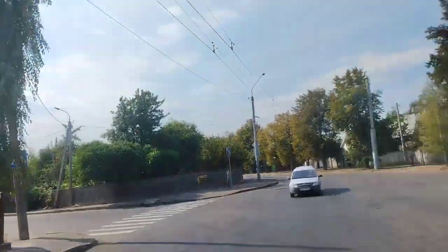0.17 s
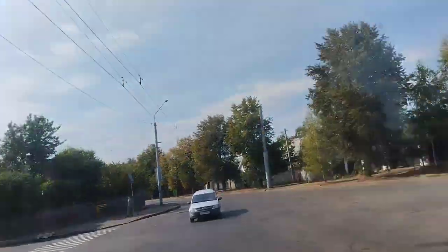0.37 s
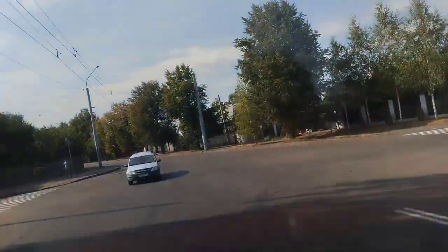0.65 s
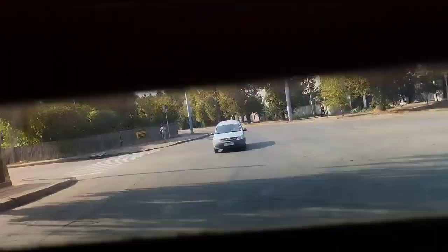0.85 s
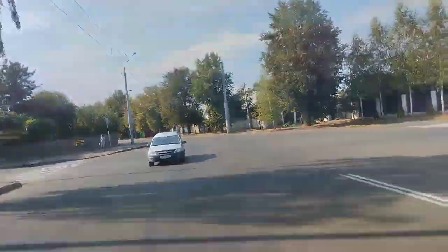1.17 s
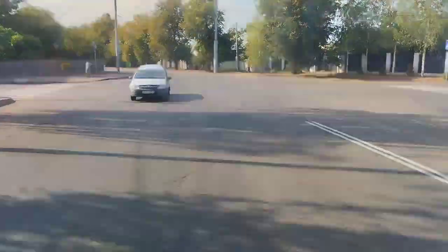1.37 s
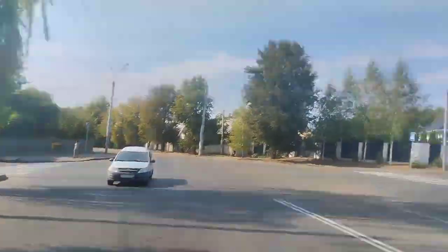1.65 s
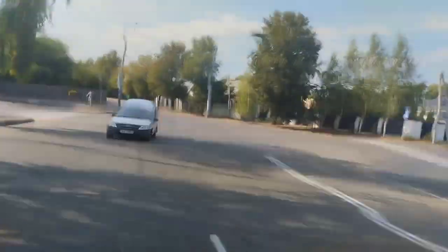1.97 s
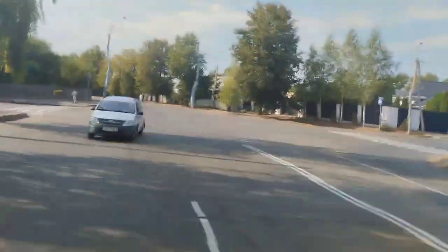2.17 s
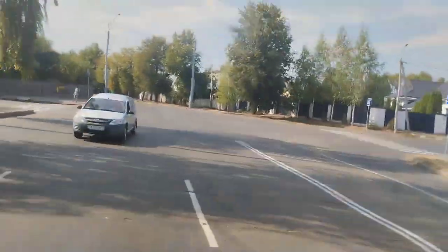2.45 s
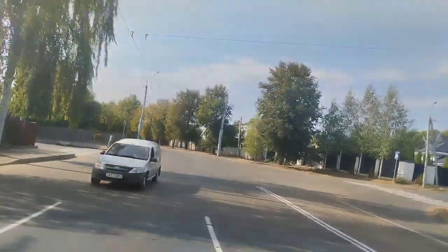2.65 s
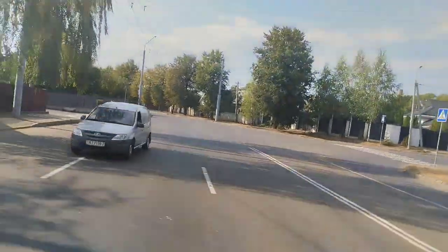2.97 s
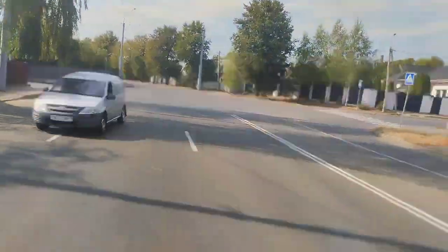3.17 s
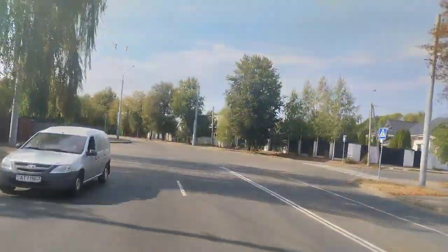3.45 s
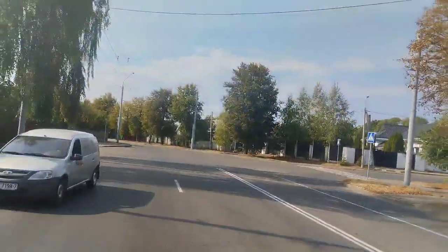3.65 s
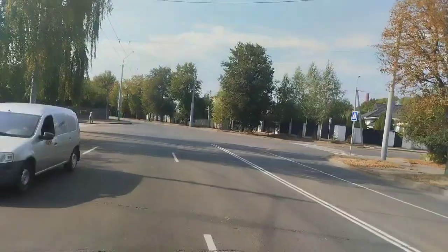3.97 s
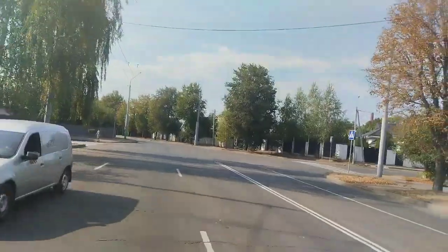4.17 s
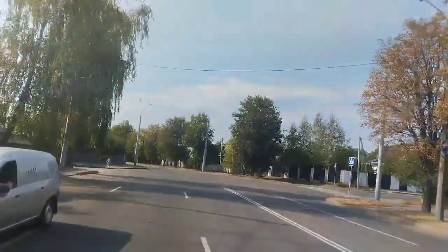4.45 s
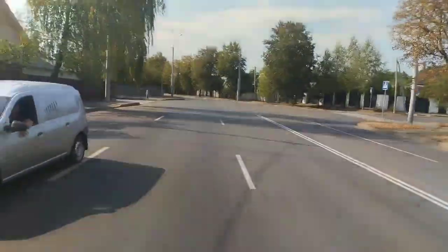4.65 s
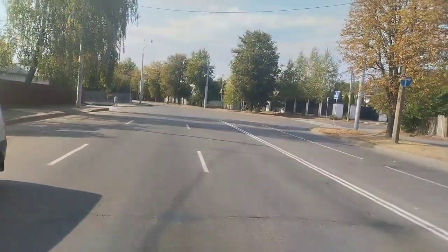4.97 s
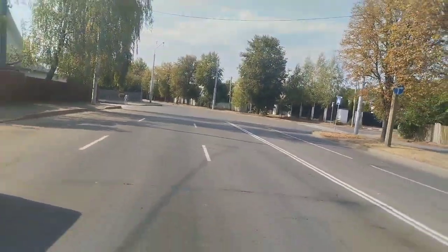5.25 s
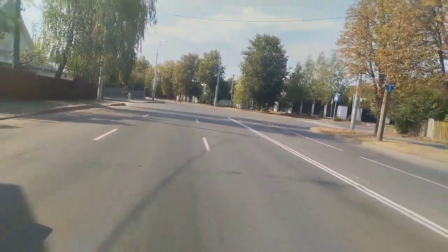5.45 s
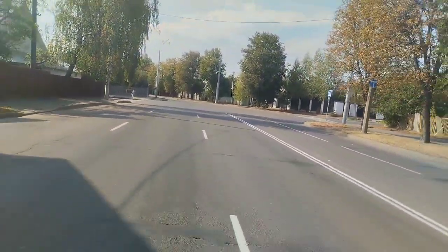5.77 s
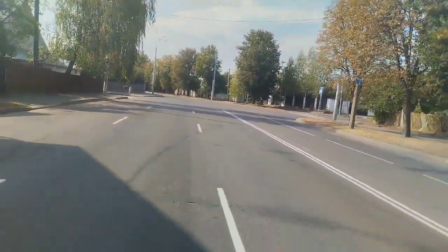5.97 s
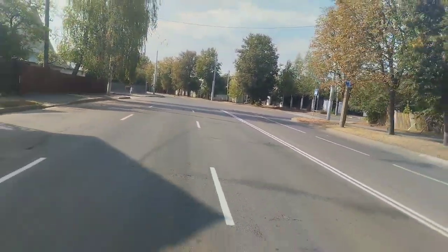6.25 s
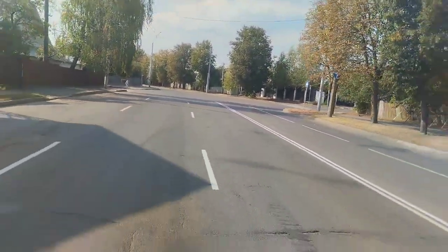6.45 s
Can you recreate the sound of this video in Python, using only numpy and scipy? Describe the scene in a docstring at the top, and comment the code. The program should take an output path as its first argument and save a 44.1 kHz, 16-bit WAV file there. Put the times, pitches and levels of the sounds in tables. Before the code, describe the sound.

A bus cabin rumbles and hums along a street while loose metal chatters, the handheld phone is knocked and bumped, and a joint squeaks once.

```python
"""Inside a city bus on the move, at the microphone of a hand-held phone: noise bands boom and rumble as the body,
roar as tyres and hiss as air, and a sine with its fourth multiple hums as the motor. Struck resonances rattle a loose
metal fitting, with a thin high ring and chinks at about 7 kHz; gritty noise buzzes. Short wavering tones chirp;
gliding tones squeak once at a joint and creak in a panel, which groans in noise. Close by, fingers snap and knock
on the phone's case and jolts push its membrane. The loudest swings clip."""
import sys
import numpy as np
from scipy import signal
from scipy.fft import rfft, irfft, next_fast_len
from scipy.io import wavfile
from scipy.ndimage import uniform_filter1d, map_coordinates

SR = 44100
rng = np.random.default_rng(int(sys.argv[2]) if len(sys.argv) > 2 else 0)


def generate_wav(signal):
    """Clip the signal to [-1, 1] and save it as 16-bit WAV at the path in sys.argv[1]."""
    frames = np.transpose(np.atleast_2d(signal))
    scaled = np.clip(frames, -1, 1) * 32767
    pcm = np.round(scaled).astype(np.int16)
    wavfile.write(sys.argv[1], SR, pcm)


N = 291204


def amp(db):
    """Gain of a level in dB."""
    return 10 ** (np.asarray(db) / 20)


def unit(x):
    """x at rms 1."""
    return x / np.sqrt(np.mean(x ** 2) + 1e-20)


def curves(rows):
    """One value per sample for each column after the time."""
    s, *cols = np.transpose(rows)
    return [np.interp(np.arange(N) / SR, s, c) for c in cols]


def wobble(rate):
    """A smooth random curve, rate knots a second."""
    knots = rng.standard_normal(int(N * rate / SR) + 4)
    return map_coordinates(knots, [np.arange(N) * rate / SR])


def filtered(x, response):
    """x times a complex response of frequency."""
    m = next_fast_len(N + SR // 2)
    return irfft(rfft(x, m) * response(np.fft.rfftfreq(m, 1 / SR)), m)[..., :N]


def colour(points):
    """Gain of (Hz, dB) points on a log axis."""
    f, db = np.transpose(points)
    return lambda hz: amp(np.interp(np.log(hz + 1), np.log(f + 1), db))


def band(lo_hz, hi_hz):
    """A soft-edged pass band."""
    return lambda hz: 1 / (1 + (lo_hz / (hz + 1)) ** 6) / (1 + (hz / hi_hz) ** 6)


def rush(response, patchy_db):
    """Coloured noise of rms 1 with patches of random gain over time and frequency."""
    z = signal.stft(rng.standard_normal(N), nperseg=512)[2]
    field = uniform_filter1d(rng.standard_normal(z.shape), size=6, axis=0)
    field = uniform_filter1d(field, size=10, axis=1)
    patchy = signal.istft(z * amp(patchy_db * unit(field)), nperseg=512)[1][:N]
    return unit(filtered(patchy, response))


def tone(hz):
    """Phase of a gliding pitch."""
    return 2 * np.pi * np.cumsum(hz) / SR


def add(track, s, sound):
    """Lays a short sound on the track at s seconds."""
    piece = track[round(s * SR):][:len(sound)]
    piece += sound[:len(piece)]


def dips():
    """Soft-edged changes in dB: the level of ride, hum and rattle dips briefly, and once lifts a little."""
    # brief level changes [t/s, length/s, level/dB]
    dip_rows = [(3.58, .075, -3), (3.704, .05, 1.5), (3.82, 0.081, -2), (4.11, 0.026, -5),
                (4.296, 0.087, -9)]
    edge_s, release_s = 0.017, 0.0026
    t = np.arange(N) / SR
    total_db = np.zeros(N)
    for s, length, db in dip_rows:
        corners = [s - edge_s, s + edge_s, s + length, s + length + release_s]
        total_db += db * np.interp(t, corners, [0, 1, 1, 0])
    return total_db


def road():
    """The body shakes and booms, the road rumbles in lumps through the floor, tyres roar, air hisses."""
    # road rumble [t/s, level/dB]
    ride = [(0, -13), (.17, -27), (.42, -15.5), (.62, -22), (.94, -18.5), (1.35, -16), (1.68, -20.5),
            (1.8, -17.5), (2.45, -20), (2.8, -18), (3.27, -13.5), (3.4, -18.5), (3.9, -19.5), (4.1, -15.5),
            (4.55, -18), (4.7, -18.5), (4.9, -13), (5.22, -22.5), (5.35, -12.5), (5.45, -19.5), (5.6, -15),
            (5.77, -21.5), (5.87, -16), (6.6, -19.5)]
    # shake of the body [t/s, level/dB]
    shaking = [(0.0, -41), (0.29, -24), (0.44, -12.5), (1.08, -28.5), (1.14, -16.5), (2.43, -21.5),
               (2.76, -8), (3.58, -19), (4.06, -10), (4.26, -24), (4.96, -13.5), (5.13, -28), (5.42, -10),
               (5.5, -27), (5.68, -14), (6.6, -19.5)]
    # booms of the body over uneven road [t/s, level/dB]
    bumps = [(0, -11), (.33, -14), (.9, -17), (1.29, -7.5), (1.5, -16), (1.85, -19.5), (2.1, -17),
             (2.48, -15), (2.68, -13.5), (2.96, -10), (3.12, -16.5), (3.56, -14), (3.9, -8.5),
             (4.15, -18.5), (4.43, -17.5), (4.8, -12.5), (5.1, -16.5), (5.3, -13), (5.57, -9), (5.8, -17),
             (6.3, -12)]
    # steady layers in the cabin [t/s, floor drone level/dB, tyre roar level/dB, air hiss level/dB]
    cabin = [(0.0, -36, -44, -42), (0.53, -40, -42, -39.5), (0.94, -37, -47, -41), (1.34, -35, -44, -39.5),
             (2.22, -36, -45, -44), (2.54, -33, -40, -44), (2.79, -28, -34, -40.5),
             (3.03, -30, -33.5, -37.5), (3.18, -26, -35, -37), (3.34, -34.5, -39.5, -37),
             (3.56, -32.5, -41, -47), (3.75, -35.5, -43, -47), (4.1, -26.5, -32.5, -41),
             (4.25, -31, -37.5, -48.5), (4.45, -34, -38, -42.5), (4.63, -34, -40, -40.5),
             (4.85, -30.5, -35.5, -36), (5.15, -32.5, -36.5, -42), (6.1, -29.5, -32, -39),
             (6.6, -30, -32, -40)]
    # spectra of the layers, rumble with the floor-pan resonances [f/Hz, relative level per Hz/dB]
    shake_spectrum = [(3, -10), (8, -8.5), (12.4, 1.5), (17, -6.5), (21, -24), (30, -23), (60, -120)]
    boom_spectrum = [(10, -60), (18, -14), (24, -0.5), (31, -5.5), (38, -15.5), (46, -28), (110, -120)]
    rumble_spectrum = [(25, -10), (42, -8.5), (60, -2), (66, 1), (75, 2), (100, -9.5), (113, -1.5),
                       (135, -6), (160, -9.5), (185, -12.5), (200, -14.5), (235, -16.5), (300, -36.5),
                       (530, -120)]
    drone_spectrum = [(160, -61), (265, -13.5), (301, -12), (394, -12), (450, -11), (539, -15), (646, -13),
                      (760, -21), (990, -31), (1670, -120)]
    roar_spectrum = [(440, -31), (740, 2), (913, -1.5), (993, -0.5), (1060, 0), (1190, -6), (1700, -9.5),
                     (2600, -18), (3380, -55), (5720, -120)]
    hiss_spectrum = [(1470, 5), (2500, 3), (3210, 2), (4840, -3), (5110, -3.5), (7220, -3), (8580, 1.5),
                     (9730, 0.5), (11200, -10), (13000, -13), (15750, -14.5), (16000, -26), (16400, -33)]
    boom_half_width_s, calm_boom_db = 0.069, -26.5
    hiss_dip_share = 0.81

    dip_db = dips()
    rumble_db, = curves(ride)
    shake_db, = curves(shaking)
    drone_db, roar_db, hiss_db = curves(cabin)

    # each bump swells and sinks as a bell curve
    bump_s, bump_db = np.transpose(bumps)
    heave = np.bincount((bump_s * SR).astype(int), amp(bump_db), N)
    bell = np.exp(-(np.arange(-SR // 2, SR // 2) / SR / boom_half_width_s) ** 2)
    heave = signal.fftconvolve(heave, bell, "same")

    lumps = wobble(30)  # random unevenness shared by rumble, drone, roar and hiss
    shake = amp(shake_db) * rush(colour(shake_spectrum), patchy_db=0.3)
    boom = (amp(calm_boom_db) + heave) * rush(colour(boom_spectrum), patchy_db=0.5)
    rumble = amp(rumble_db + 1.48 * lumps) * rush(colour(rumble_spectrum), patchy_db=0.86)
    drone = amp(drone_db + 1.1 * lumps) * rush(colour(drone_spectrum), patchy_db=1.5)
    roar = amp(roar_db + 1.0 * lumps) * rush(colour(roar_spectrum), patchy_db=0.66)
    stir_db = 0.8 * lumps + 0.4 * wobble(9)
    hiss_gain = amp(hiss_db + stir_db + hiss_dip_share * dip_db)
    hiss = hiss_gain * rush(colour(hiss_spectrum), patchy_db=2.0)
    return amp(dip_db) * (shake + boom + rumble + drone + roar) + hiss


def motor():
    """A clean hum of a sine and its fourth multiple, with narrow bands of noise above it."""
    # narrow noise bands [f/Hz, width/Hz, level re hum setting/dB, drift/(dB/s)]
    whistles = [(994, 30, -24, 0), (9750, 220, -28, 0), (12840, 380, -33, -.4)]
    hum_hz, hum_db, fourth_db = 248, -28, -22.5
    swell_s, swell_db = 0.73, -18.5  # the hum swells in from below
    fade_s, fade_db = 6.21, -5  # and sinks from fade_s to the end
    t = np.arange(N) / SR
    dip_db = dips()

    swell = swell_db * np.exp(-3 * t / swell_s)
    fade = np.interp(t, [fade_s, N / SR], [0, fade_db])
    level_db = hum_db + swell + fade + dip_db + 0.84 * wobble(11)
    pitch_hz = hum_hz + 0.4 * wobble(1.5) + 0.37 * wobble(6)
    fundamental = np.sin(tone(pitch_hz))
    fourth = amp(fourth_db + 2.5 * wobble(4.2)) * np.sin(4 * tone(pitch_hz + 1.515 * wobble(30)))
    hum = np.sqrt(2) * amp(level_db) * (fundamental + fourth)

    whistling = np.zeros(N)
    for hz, width, db, drift in whistles:
        noise = rush(lambda f: 1 / (1 + ((f - hz) / width * 2) ** 2), patchy_db=1.2)
        whistling += amp(db + drift * t + 0.74 * wobble(2.7)) * noise
    return hum + amp(hum_db + dip_db) * whistling


def fitting():
    """Contacts strike and chatter for a few ms, ring metal modes unevenly and shake off a dying shower of clatter."""
    # contacts [t/s, relative ping level/dB, relative clatter level/dB, brightness: top over clatter/dB]
    contacts = [(.2557, -17.5, -27, -13), (.5147, -25, -37, -8), (.6824, -21.5, -28.5, -20),
                (.8563, -21, -27.5, -14), (.9502, -23, -35, -18), (1.0266, -19.5, -31, -23),
                (1.1397, -20.5, -25.5, -17), (1.1784, -41, -25, -26), (1.2207, -18, -25.5, -13),
                (1.268, -21.5, -24.5, -19), (1.455, -29, -27, -26), (1.5608, -38, -24.5, -16),
                (1.748, -36, -27.5, -18), (1.8377, -29, -32, -14), (2.2014, -32, -36, -9),
                (2.5815, -13, -25, -7), (2.642, -15.5, -20.5, -8.5), (2.6544, -11.5, -24, -8),
                (2.6737, -27, -32, -10), (2.7327, -31, -33, -7), (2.795, -25, -34, -22),
                (2.947, -20.5, -24, -13), (2.9674, -43, -33, -0.5), (3.0194, -35, -33, -11),
                (3.1025, -13.5, -19.5, -8.5), (3.2311, -19, -29, -13), (3.2998, -14, -22.5, -10),
                (3.3245, -30, -50, -2), (3.3605, -15, -35, -9), (3.3957, -23, -31, -9),
                (3.483, -32, -31.5, -9.5), (3.9025, -17, -25, -4), (3.9888, -12, -23, -6),
                (4.0459, -30, -26, -3), (4.141, -24, -27.5, -9), (4.159, -36, -38, -3),
                (4.22, -17, -26.5, -6.5), (4.2925, -38, -39, 3.5), (4.5945, -43, -51, 10.5),
                (4.6415, -30, -37, 1), (4.6797, -33, -27, -8), (4.705, -36, -30, -7), (4.817, -16, -32, -4),
                (4.85, -28, -24.5, -8.5), (4.9206, -32, -35, -6), (4.9945, -29, -32, -19.5),
                (5.1684, -25, -30.5, -7), (5.3303, -28, -33, -9), (5.406, -21, -23.5, -8),
                (5.5084, -34, -24, -4.5), (5.5706, -15, -25.5, -3.5), (5.6385, -17, -27.5, -13),
                (5.7458, -15, -28.5, -9), (5.769, -31, -36, -3), (5.8011, -16.5, -28.5, -18.5),
                (5.917, -11.5, -25, -10), (5.9725, -12, -23, -8), (6.0756, -26, -29, -21),
                (6.1573, -19.5, -28.5, -19), (6.2296, -17, -29.5, -18), (6.3016, -26, -30.5, -21),
                (6.4095, -20, -28.5, -26), (6.552, -26, -33, -16)]
    # modes of the metal [f/Hz, level/dB, t60/s]
    metal_modes = [(1561, -2, .09), (2750, -8, .04), (3400, -4, .035), (3930, -3, .04), (6150, -6, .05),
                   (5780, -8, .04), (7080, -5, .05), (7500, -4, .04), (8500, -11, .03), (8740, -6, .04),
                   (8855, -5, .085), (9040, -6, .04), (9660, -18, .12), (10400, -3, .11), (11500, -10, .06),
                   (11820, -6, .09), (11920, -10, .06), (12460, -6, .06), (13500, -11, .05)]
    # spectrum of the shower [f/Hz, relative level per Hz/dB]
    shower_spectrum = [(760, -2), (1300, -12.5), (2730, -12), (4780, -14.5), (5100, -21), (5910, -15),
                       (7960, -14.5), (8840, -15.5), (15200, -48), (16400, -37)]
    # low, ping, mid, top and fizz zones [lower f/Hz, upper f/Hz]
    zones = [(1300, 5500), (8000, 9900), (5500, 8000), (9900, 16000), (12500, 16400)]
    mode_zone_db = (-30.5, -27.0, -26.0, -25.5)  # the fizz has no modes of its own
    shower_zone_db = (-8.5, -26.5, -7.5, -7.5, -3)
    blow_db, chatter_db = 13.5, -0.5  # first blow of a contact, and the chatter after it
    mid_db, mid_follows, fizz_follows = -2.5, 0.74, 1.2  # shares of the brightness
    light_count, light_db = 14, -39.5  # light contacts at chance moments

    t = np.arange(SR // 5) / SR
    rise = 1 - np.exp(-t / 0.0013)
    short = amp(chatter_db - 60 * t / 0.046) * rise
    long = amp(-60 * t / 0.18) * rise
    light = [(u * N / SR, light_db + 6 * a, light_db + 6 * b, -12 * c)
             for u, a, b, c in rng.random((light_count, 4))]

    blow, chatter, shower = np.zeros((3, len(zones), N))
    for s, ping_db, low_db, bright_db in [*contacts, *light]:
        zone_db = (low_db, ping_db, low_db + mid_db + mid_follows * bright_db,
                   low_db + bright_db, low_db + fizz_follows * bright_db)
        for k, db in enumerate(zone_db):
            add(blow[k], s + 0.001, np.array([amp(db + blow_db)]))  # a single-sample impulse
            add(chatter[k], s, amp(db) * short)
            add(shower[k], s, amp(db) * long)

    out = np.zeros(N)
    grit = amp(2.0 * wobble(250))  # fast random unevenness of the shower
    for k, (lo, hi) in enumerate(zones):
        if k < len(mode_zone_db):
            # width in Hz of a mode from its ring time
            modes = [(c, db, np.log(1000) / np.pi / t60) for c, db, t60 in metal_modes if lo < c < hi]

            def metal(f):
                """Resonators of this zone, inside its band."""
                ring = sum(amp(db) * 1j * f * SR / np.pi / (c * c - f * f + 1j * f * w) for c, db, w in modes)
                return ring * band(lo / 1.1, hi * 1.1)(f)

            strike = blow[k] + chatter[k] * rng.standard_normal(N)
            out += amp(mode_zone_db[k]) * filtered(strike, metal)
        clatter = rush(lambda f: colour(shower_spectrum)(f) * band(lo, hi)(f), patchy_db=3.0)
        out += amp(shower_zone_db[k]) * shower[k] * grit * clatter
    return amp(0.98 * dips()) * out


def struck(events, modes, detune):
    """Struck modes ring briefly, each time at a new level and slightly new pitch."""
    out = np.zeros(N)
    t = np.arange(SR // 6) / SR
    rise = 1 - np.exp(-t / 0.00086)
    hz, mode_db, t60 = np.transpose(modes)[:, :, None]
    for s, db in events:
        # random level in dB, relative pitch and phase in rad
        draw = rng.standard_normal((3, len(hz), 1)) * [[[2]], [[detune]], [[3]]]
        decay = amp(mode_db + draw[0] - 60 * t / t60)
        ring = decay * np.sin(2 * np.pi * hz * (1 + draw[1]) * t + draw[2])
        add(out, s, amp(db) * rise * ring.sum(0))
    return out


def high_rings():
    """The fitting's thin high ring at about 4745 Hz, with a weaker mode below, heard with some contacts."""
    # rings [t/s, level/dB]
    strikes = [(0.2568, -33), (0.6834, -44), (1.1463, -36), (1.2214, -35), (1.277, -34), (1.4566, -39),
               (1.5624, -35), (2.5815, -34), (2.6444, -36), (3.1048, -42), (3.3044, -35), (3.3987, -43),
               (3.4834, -41), (3.9988, -38), (4.1594, -40), (4.2243, -40), (5.3333, -43), (5.4051, -43),
               (5.5744, -41), (5.9194, -39), (5.9744, -37)]
    # modes of the ring [f/Hz, level/dB, t60/s]
    ring_modes = [(4745, -1, .13), (3940, -8, .05)]
    return struck(strikes, ring_modes, detune=0.003)


def chirps():
    """Faint chirps: short tones of wavering phase that swell and sink."""
    # faint tones [t/s, f/Hz, level/dB, length/s]
    faint_tones = [(0.463, 3670, -36, 0.022), (0.985, 1806, -36.5, 0.066), (1.246, 1585, -35, 0.022),
                   (1.569, 1580, -41, 0.1), (3.227, 1570, -32, 0.034), (3.326, 1564, -35.5, 0.048),
                   (5.37, 3260, -39, .04)]
    out = np.zeros(N)
    waver = 0.84 * wobble(140)  # rad
    for s, hz, db, length in faint_tones:
        t = np.arange(round(length * SR)) / SR
        phase = 2 * np.pi * hz * t + waver[round(s * SR):][:len(t)]
        add(out, s, amp(db) * np.sin(np.pi * t / length) * np.sin(phase))
    return out


def chinks():
    """Some rattles chink at about 7 kHz in a cluster of short-lived modes."""
    # chinks [t/s, level/dB]
    strikes = [(1.1817, -31), (1.2156, -39), (2.6299, -28), (2.9497, -28), (2.9901, -28.5), (3.1644, -30),
               (3.2236, -31), (3.3218, -27), (3.3598, -24.5), (3.46, -34), (3.9774, -28), (4.2248, -31),
               (4.8145, -24), (5.7269, -35), (5.7683, -27), (5.8107, -36), (5.8556, -40), (5.9125, -32),
               (6.076, -26)]
    # modes of a chink [f/Hz, level/dB, t60/s]
    chink_modes = [(6920, -7, .07), (7120, -4, .05), (7220, -8, .04), (7520, -14, .05), (8500, -12, .03)]
    return struck(strikes, chink_modes, detune=0.006)


def fingers():
    """Taps on the case: a bright snap with its top edge, a duller click and a knock in the case's modes."""
    # taps [t/s, relative snap level/dB, relative knock level/dB, tilt toward the upper modes/dB]
    taps = [(1.429, -19, -26, 3.5), (1.7267, -10, -35, 8.5), (1.7283, -12, -25, 5.5),
            (1.7296, -19, -11.5, 5.5), (1.7308, -10, -11.5, -10.5), (1.7347, -1.5, -29, 1),
            (1.7422, -18, -29, -5), (1.8933, -14, -24, 5.5), (1.8946, -10, -13, 4),
            (1.896, -28, -12.5, -12), (1.8995, -7.5, -25, -3), (1.908, -19, -39, 0), (1.931, -24, -23, 3.5),
            (1.9365, -11.5, -33, -6), (1.9448, -16, -36, 0), (1.954, -24, -31, -4), (1.9626, -23, -26, -4),
            (1.982, -2, -29, 4), (1.9921, -2.5, -22, 3.5), (2.093, -23, -42, -3), (2.163, -28, -22.5, -3),
            (3.5343, -41, -29, -10), (3.556, -39, -19.5, -3), (3.5585, -32, -37, 0), (3.587, -40, -20, -10),
            (3.6697, -27, -12, -2.5), (3.679, -46, -18.5, 1.5), (3.69, -49, -24, 1), (3.7561, -24, -17, -2),
            (3.7778, -36, -21, -7), (3.7914, -15.5, -22, -7), (3.801, -25, -11.5, -9.5),
            (3.9841, -28, -26, 6), (4.047, -15, -15, -1), (4.0938, -34, -14, 6.5), (4.135, -28, -6.5, 0.5),
            (4.14, -8, -16, 6), (4.2779, -30, -22.5, 0.5), (4.352, -33, -31, 1), (4.398, -42, -16.5, 1),
            (4.449, -46, -22, -5), (4.486, -30, -30, -4), (4.6739, -26, -24, -5), (4.927, -27, -23, 4.5),
            (5.1142, -23.5, -29, 0), (6.536, -25, -38, -7), (6.569, -31, -35, -3), (6.584, -28, -28, -5)]
    # low, middle and two upper modes of the case [f/Hz, relative level/dB, t60/s]
    case = [(387, 0, 0.016), (737, 1, 0.007), (1210, -5, 0.006), (1630, -12, 0.01)]
    # spectrum of a snap [f/Hz, relative level/dB]
    port = [(4000, -17), (6000, -9.5), (7500, 2), (9000, -0.5), (10500, -2), (12000, -24), (14000, -47)]
    edge_db, click_of_snap_db, click_of_knock_db = -20, -19.5, -15.5  # edge and click follow snap and knock
    edge, snap, click, knock = np.zeros((4, N))
    t = np.arange(SR // 12) / SR
    hz, mode_db, t60 = np.transpose(case)[:, :, None]
    for s, snap_db, knock_db, tilt_db in taps:
        add(snap, s, amp(snap_db + 2.5 - 60 * t / 0.0031) * (1 - np.exp(-t / 0.00019)))
        add(edge, s, amp(snap_db + edge_db - 60 * t / 0.005))
        click_gain = amp(snap_db + click_of_snap_db) + amp(knock_db + click_of_knock_db)
        add(click, s, click_gain * amp(-60 * t / 0.01))
        tilted = np.array([7.0 - 0.52 * tilt_db, 4.5, 2.75 * tilt_db, 0.5 + 0.86 * tilt_db])[:, None]
        # random level in dB and relative pitch
        draw = rng.standard_normal((2, len(hz), 1)) * [[[1.5]], [[0.03]]]
        decay = amp(knock_db + tilted + mode_db + draw[0] - 60 * t / t60)
        add(knock, s, (decay * np.sin(2 * np.pi * hz * (1 + draw[1]) * t)).sum(0))
    snap = snap * rush(colour(port), patchy_db=0)
    edge = edge * rush(band(11500, 16300), patchy_db=0)
    click = click * rush(band(2300, 8000), patchy_db=0)
    return knock + snap + edge + click


def jolts():
    """Jolts of the phone push the microphone's membrane once, a sine under a quick bell decay."""
    # jolts [t/s, level before the bell decay/dB, f/Hz]
    thuds = [(2.863, -4.5, 86.5), (2.951, -3.5, 45.5), (3.559, 3, 103), (3.759, 1, 127), (4.096, -4.5, 71),
             (4.142, -1, 132), (4.274, 0, 120), (4.399, -14, 40), (4.829, -2, 67), (4.853, 3.5, 139),
             (5.552, -1.5, 35.5)]
    out = np.zeros(N)
    t = np.arange(SR // 12) / SR
    for s, db, push_hz in thuds:
        cycles = push_hz * t
        add(out, s, -amp(db) * np.sin(2 * np.pi * cycles) * np.exp(-1.3 * cycles ** 2))
    return out


def buzzes():
    """The fitting buzzes densely against its seat: bright gritty bursts that sag, then stop short."""
    # bursts [t/s, length/s, level/dB]
    bursts = [(4.045, 0.032, -23.5), (4.14, .02, -24.5)]
    # spectrum of the buzz [f/Hz, relative level per Hz/dB]
    buzz_spectrum = [(4000, -30), (6000, -3), (9500, -1), (12500, -3), (15500, -9), (16400, -20)]
    sag_db, release_s = -8, 0.006
    t = np.arange(N) / SR
    on = np.zeros(N)
    for s, length, db in bursts:
        corners = [s, s + 0.001, s + length, s + length + release_s]
        on += amp(db) * np.interp(t, corners, [0, 1, amp(sag_db), 0])
    grit = amp(2.7 * wobble(300))
    return on * grit * rush(colour(buzz_spectrum), patchy_db=3.0)


def squeak():
    """A rubbing joint sings once, unevenly, with two overtones."""
    # course of the squeak [t/s, f/Hz, level/dB]
    course = [(4.41, 2760, -58), (4.432, 2790, -43), (4.462, 2810, -39), (4.472, 2780, -44),
              (4.498, 2870, -32.5), (4.52, 2720, -37.5), (4.532, 2760, -34), (4.6, 2740, -57)]
    hz, db = curves(course)
    start, end = course[0][0], course[-1][0]
    on = np.interp(np.arange(N) / SR, [start, start + 0.02, end - 0.015, end], [0, 1, 1, 0])
    phase = tone(hz + 18 * wobble(300))
    voice = np.sin(phase) + amp(-18) * np.sin(2 * phase) + amp(-8.5) * np.sin(3 * phase)
    return on * np.sqrt(2) * amp(db + 3.7 * wobble(200)) * voice


def panel():
    """One bump makes a panel creak on a rising pitch, then groan in its resonances as it flexes."""
    # resonances of the panel [f/Hz, width/Hz, level/dB]
    resonances = [(462, 38, 0), (600, 230, -8), (1050, 59, -11), (1900, 500, -24)]
    creak_s, creak_length_s, creak_hz, creak_rise_hz = 4.79, 0.075, 685, 45
    creak_db, overtone_db = -25, -11
    groan_s, groan_half_s, groan_db = 4.865, 0.036, -21
    t = np.arange(N) / SR
    along = np.clip((t - creak_s) / creak_length_s, 0, 1)
    phase = tone(creak_hz + creak_rise_hz * along + 8 * wobble(80))
    voice = np.sin(phase) + amp(overtone_db) * np.sin(2 * phase)
    creak = np.sin(np.pi * along) * amp(creak_db + 2.5 * wobble(90)) * voice

    def body(f):
        """Sum of the panel's resonance peaks."""
        return sum(amp(db) / np.sqrt(1 + ((f - c) / w * 2) ** 2) for c, w, db in resonances)

    swell = np.exp(-((t - groan_s) / groan_half_s) ** 2)
    return creak + amp(groan_db) * swell * rush(body, patchy_db=0)


def scene():
    """Everything in the cabin and on the case, at one microphone."""
    ride_along = road() + motor()
    rattling = fitting() + high_rings() + chinks() + buzzes()
    handling = fingers() + jolts()
    return (ride_along + rattling + chirps() + handling + squeak() + panel())[None]


def record(dry):
    """The microphone drops the slowest swings, full-scale ones clip; the top fades, then stops at the band limit."""
    top_hz = 16500
    heard = filtered(dry, lambda hz: 1j * hz / (4 + 1j * hz))  # high-pass at 4 Hz
    clipped = heard / (1 + np.abs(heard) ** 12) ** (1 / 12)
    return filtered(clipped, lambda hz: (hz < top_hz) * (0.2 + 0.8 / (1 + (hz / 15880) ** 200)))


dry = scene()
out = record(dry)
generate_wav(out)
```